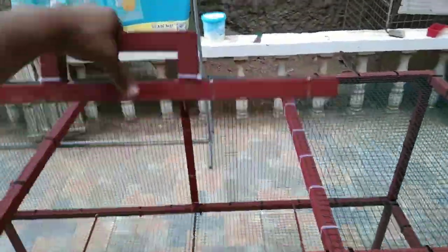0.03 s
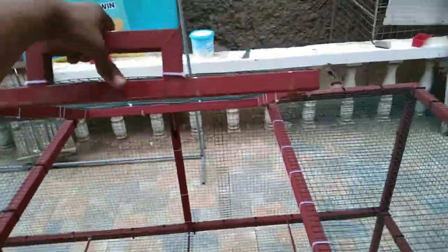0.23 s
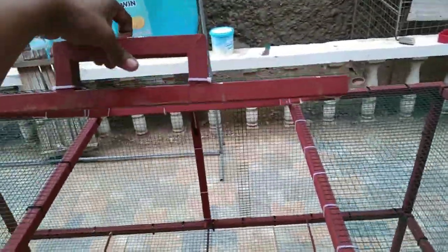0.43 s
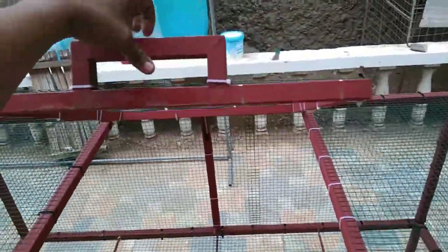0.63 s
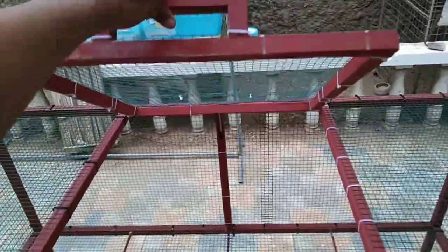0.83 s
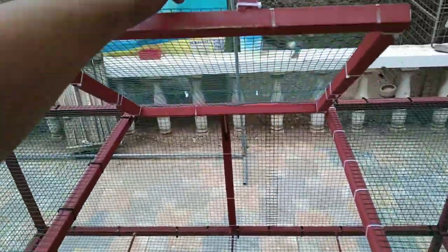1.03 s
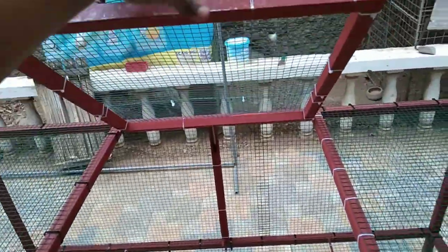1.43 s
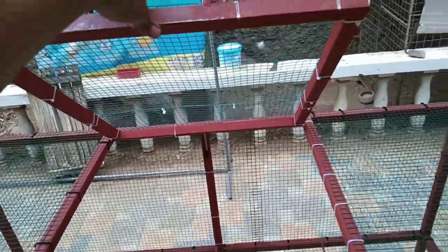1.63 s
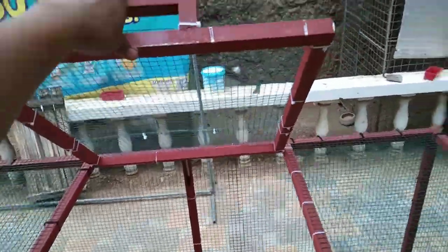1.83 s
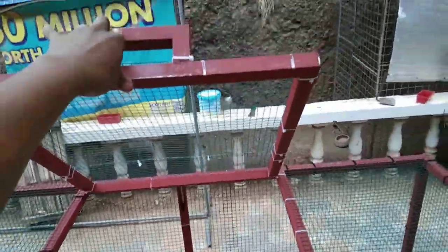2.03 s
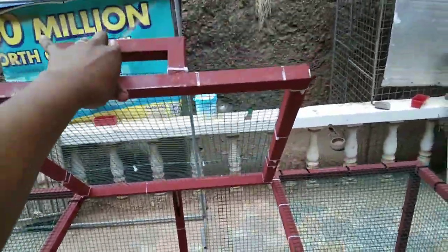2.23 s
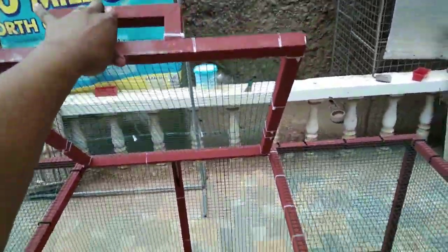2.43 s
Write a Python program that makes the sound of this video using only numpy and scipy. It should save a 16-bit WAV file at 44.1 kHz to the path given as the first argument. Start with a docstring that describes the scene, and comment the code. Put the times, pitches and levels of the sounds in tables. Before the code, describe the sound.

A wire-mesh cage lid clacks and rattles as it is lifted, its hinges squeaking faintly.

```python
"""A wire-mesh lid is lifted on a steel-framed cage, out on a patio, heard on one microphone.
The lid creaks, then clacks and chatters on its frame, setting wires and frame ringing. Farther off, its
wire hinges squeak in short, mostly falling slips while the frame drones softly. A dry rubbing hiss
follows as the lid is held open. Nearby walls add a thin tail; a low outdoor rumble lies under it all."""
import sys
import numpy as np
from scipy import signal
from scipy.fft import rfft, irfft
from scipy.io import wavfile

SR = 44100
rng = np.random.default_rng(int(sys.argv[2]) if len(sys.argv) > 2 else 0)


def wav_record(signal):
    """Record a signal, one row per channel, as 16-bit PCM in the file named by sys.argv[1]."""
    frames = np.transpose(np.atleast_2d(signal))
    bounded = np.clip(frames, -1, 1)
    # unit amplitude maps onto the largest positive 16-bit level
    quanta = np.round(bounded * 32767).astype(np.int16)
    wavfile.write(sys.argv[1], SR, quanta)


N = 114660
TIME = np.arange(N) / SR

# spectrum of the background rumble and faint hiss, cut steeply above about 8 kHz: f/Hz, level/dB
BACKGROUND_COLOUR = [(25, -40), (70, -2), (100, -4.5), (145, 4.5), (200, -11.5), (480, -15.5), (570, -25.5),
                     (700, -23.5), (850, -20.5), (3200, -18.5), (8200, -25), (9000, -45.5), (15000, -84)]
# course of the frame's drone: t/s, relative level/dB
DRONE_LEVEL = [(.6, -52.5), (.74, -44), (1.33, -49), (1.42, -58.5), (1.8, -54), (2.2, -52), (2.6, -48.5)]
# spectrum of the drone: f/Hz, level/dB
DRONE_COLOUR = [(170, -15.5), (310, 1.5), (470, -3), (550, -10.5), (640, -22)]
# dull bumps as the frame shifts: t/s, level/dB
BUMPS = [(1.658, -44)]
# low groans of the frame: t/s, length/s, f/Hz, fall/Hz, level/dB
GROANS = [(-.03, 0.065, 493, 20, -43), (.86, 0.056, 345, 10.5, -40.5), (.98, 0.05, 468.7, -7, -37.5),
          (1.822, .04, 460, 69.5, -48), (1.91, .12, 338, -7, -44)]
# course of the rubbing: t/s, relative level/dB
RUB_LEVEL = [(1.46, -74), (1.61, -50.5), (1.66, -40.5), (1.78, -37.5), (1.84, -40.5), (1.91, -52.5),
             (2.03, -46.5), (2.07, -48.5), (2.14, -46), (2.42, -46.5), (2.47, -55.5), (2.6, -67)]
# spectrum of the rubbing: f/Hz, level/dB
RUB_COLOUR = [(650, -77), (1500, -13.5), (3030, 0), (7850, -5), (9000, -12), (11000, -26), (15000, -43)]
# hinge slips: t/s, length/s, f/Hz, fall/Hz, level/dB
HINGE_SLIPS = [(.287, 0.015, 5330, -5, -42), (.664, 0.042, 3434, 221.5, -44),
               (.69, 0.015, 5500, -1100, -46), (.708, .025, 3700, -200, -42), (.785, 0.037, 3190, 339, -45),
               (.873, 0.038, 3070, 260.5, -43), (.974, 0.057, 2900, 128.5, -47),
               (1.085, .045, 2874, 88.5, -47), (1.168, 0.05, 2843, 159, -45.5),
               (1.283, .044, 2847, 112, -48)]
# a wire singing with the hinge: t/s, length/s, f/Hz, fall/Hz, level/dB
WIRE_TONES = [(1.12, 0.2, 4444, 30.4, -57)]
# creaks of the lid: t/s, length/s, f/Hz, fall/Hz, level/dB
CREAKS = [(.165, 0.033, 1833, -37.5, -40.5), (.195, 0.039, 1777, 58, -46.5)]
# scrapes of wire on steel: t/s, length/s, lowest resonance f/Hz, level/dB
SCRAPES = [(0.141, 0.1, 2530, -41), (0.69, 0.071, 3370, -42.5)]
# resonances of a scrape: ratio to the lowest, level/dB
SCRAPE_RESONANCES = [(1, 0.5), (1.25, 1), (1.55, -5)]
# small wire ticks: t/s, level/dB, centre f/Hz, rustle relative to the tick/dB
TICKS = [(0.849, -27.5, 6000, -25), (1.3425, -32, 4200, -11.5), (1.542, -40, 5000, -3.5)]
# spectrum of a tick: ratio to the centre, level/dB
TICK_COLOUR = [(.2, -28), (.55, -4.5), (1, 0.5), (1.4, -2.5), (2.2, -11)]
# spectrum of the cage's shudder: f/Hz, level/dB
SHUDDER_COLOUR = [(130, -22), (240, 4), (720, -3), (1000, -16.5), (3000, -32)]
# the frame's ringing modes: f/Hz, relative level/dB, t60/s
FRAME_MODES = [(3357, -4, .8), (3433, 2.5, 0.37), (3509, -6, .42), (3580, 1, 0.43), (3870, -1, 0.35),
               (4003, -9, 0.34), (6100, 4, 0.11), (6533, -3, 0.11), (6830, 6, 0.15)]
# the loose mesh buzzes between big contacts: t/s, length/s, opening relative level/dB
CHATTERS = [(0.242, .065, -18), (.324, .03, -22.5)]
# big contacts of lid and frame: t/s, relative level/dB, brightness/dB
CLACKS = [(0.0379, -15.5, -2.5), (0.2240, -8, -20), (0.2282, -10, 15.5), (0.2328, -9.5, 15.5),
          (0.2378, -16.5, 21), (0.2406, -7, 5), (0.2452, -13.5, 8.5), (0.2515, -8.5, 5.5),
          (0.2570, -7.5, -14), (0.2890, -15, -8), (0.301, -11, -18), (0.3207, -20, -4), (0.3245, -11.5, 0),
          (0.336, -19.5, 0), (0.3470, -22.5, -2), (0.4261, -17.5, -4), (0.4291, -16.5, 5.5)]
# spectrum of a contact: f/Hz, level/dB
CLACK_COLOUR = [(150, -26), (300, -11), (750, -8), (1100, -16), (2000, -13), (3000, -1.5), (4200, -2),
                (5000, -12.5), (6200, 0.5), (7400, -4), (9500, -9), (15000, -11)]


def from_db(db):
    """Decibels to gain."""
    return 10 ** (np.asarray(db) / 20)


def rms_one(x):
    """Scale to unit rms."""
    return x / np.sqrt(np.mean(x ** 2) + 1e-20)


def gain_at(colour, hz):
    """Gain of a spectrum table on a log-frequency axis."""
    table_hz, table_db = np.transpose(colour)
    return from_db(np.interp(np.log(hz + 0.0009), np.log(table_hz), table_db))


def noise(colour):
    """Unit noise with the given spectrum."""
    gain = gain_at(colour, np.fft.rfftfreq(N, 1 / SR))
    return rms_one(irfft(rfft(rng.standard_normal(N)) * gain, N))


def drift(per_s):
    """Smooth random motion of unit spread."""
    return rms_one(np.interp(TIME * per_s, np.arange(N), rng.standard_normal(N)))


def decay(t60, t=TIME):
    """Exponential fall by 60 dB in t60 seconds."""
    return np.exp(-np.log(1000) * t / t60)


def swell(start, length):
    """A rounded rise and fall."""
    return np.sqrt(np.abs(np.sin(np.pi * np.clip((TIME - start) / length, 0, 1))))


def phase_of(hz):
    """Running phase of a moving pitch."""
    return 2 * np.pi * np.cumsum(hz) / SR


def filtered(x, kind, hz, order):
    """Low-, high- or band-pass with a flat passband."""
    return signal.sosfilt(signal.butter(order, hz, kind, fs=SR, output="sos"), x)


def add(out, start, sound):
    """Mix a sound in at its time."""
    i = max(int(start * SR), 0)
    out[i:i + len(sound)] += sound[:N - i]


def background():
    """A steady low outdoor rumble with faint hiss."""
    return from_db(-47.5) * noise(BACKGROUND_COLOUR)


def patio(x, wet_db):
    """The direct sound plus a thin diffuse tail from the nearby walls."""
    tail = rng.standard_normal(N) * decay(t60=0.65) * (1 - decay(t60=0.065))
    tail /= np.sqrt(np.sum(tail ** 2))
    return x + from_db(wet_db) * signal.fftconvolve(x, tail)[:N]


def stick_slip(rows, jitter, jitter_per_s, flutter_db, octave_db):
    """Wavering friction tones that glide as each slip runs out; a negative fall rises."""
    out = np.zeros(N)
    for start, length, hz, fall_hz, db in rows:
        glide_hz = hz - fall_hz * np.clip((TIME - start) / length - 0.5, -0.5, 0.5)
        phase = phase_of(glide_hz * (1 + jitter * drift(jitter_per_s)))
        level = np.sqrt(2) * from_db(db + flutter_db * drift(120)) * swell(start, length)
        out += level * (np.sin(phase) + from_db(octave_db) * np.sin(2 * phase))
    return out


def frame_drone():
    """The moving frame hums low and unevenly, with bumps and short groans."""
    level = from_db(2 + np.interp(TIME, *np.transpose(DRONE_LEVEL)))
    bumps = sum(from_db(db) * swell(start, length=0.04) for start, db in BUMPS)
    hum = (level + bumps) * noise(DRONE_COLOUR)
    groans = stick_slip(GROANS, jitter=0.015, jitter_per_s=64, flutter_db=1, octave_db=-35)
    return filtered(hum + groans, "low", hz=540, order=12)


def rub():
    """Fine-grained sliding friction while the lid is held open."""
    level_db = 0.5 + np.interp(TIME, *np.transpose(RUB_LEVEL))
    grain_db = drift(500)
    return from_db(level_db + grain_db) * noise(RUB_COLOUR)


def hinges():
    """The wire hinges stick and slip in squeaks, and one wire sings along."""
    squeaks = stick_slip(HINGE_SLIPS, jitter=0.021, jitter_per_s=600, flutter_db=3.5, octave_db=-12)
    wire = stick_slip(WIRE_TONES, jitter=0.007, jitter_per_s=500, flutter_db=1.5, octave_db=-38)
    return squeaks + wire


def lid_creak():
    """The lid sticks and slips just before it lets go."""
    return stick_slip(CREAKS, jitter=0.04, jitter_per_s=600, flutter_db=1.5, octave_db=-8.5)


def wire_scrapes():
    """Rapid uneven catches of wire on steel excite a few broad resonances."""
    rough_db, catches_per_s, half_width = 2, 450, 0.085
    out = np.zeros(N)
    for start, length, hz, db in SCRAPES:
        friction = rng.standard_normal(N) * from_db(rough_db * drift(catches_per_s))
        body = np.zeros(N)
        for ratio, level_db in SCRAPE_RESONANCES:
            edges_hz = hz * ratio * np.exp([-half_width, half_width])
            body += from_db(level_db) * rms_one(filtered(friction, "band", edges_hz, order=2))
        out += from_db(db) * swell(start, length) * rms_one(body)
    return out


def wire_ticks():
    """Wires nudge into place and rustle briefly."""
    out = np.zeros(N)
    attack = 1 - np.exp(-TIME / 0.00051)
    for start, db, centre_hz, rustle_db in TICKS:
        shape = attack * (decay(t60=0.0073) + from_db(rustle_db) * decay(t60=0.16))
        colour = [(centre_hz * ratio, level_db) for ratio, level_db in TICK_COLOUR]
        add(out, start, from_db(db) * shape * noise(colour))
    return out


def cage_shudder():
    """The whole cage's low, dying response to the big clack."""
    start_s, rise_s, t60_s = 0.219, 0.015, 0.78
    t = np.maximum(TIME - start_s, 0)
    shape = (1 - np.exp(-t / rise_s)) * decay(t60_s, t)
    return 2 * from_db(-45) * shape * noise(SHUDDER_COLOUR)


def frame_ring():
    """Big contacts feed the frame's modes, which beat and waver as the lid shifts on its seat."""
    ring_db, beat_db, waver_hz = -30.5, 3, 7.1
    out, blows = np.zeros(N), np.zeros(N)
    for start, db, _ in CLACKS:
        add(blows, start, [from_db(db) ** 2])
    for hz, db, t60 in FRAME_MODES:
        kept_per_sample = decay(t60, 1 / SR) ** 2
        energy = signal.lfilter([1], [1, -kept_per_sample], blows + 1e-18)
        level = from_db(ring_db + db + beat_db * drift(34.4)) * np.sqrt(energy)
        out += level * np.sin(phase_of(hz + waver_hz * drift(58.7)))
    return out


def mesh_wires(t, count=260):
    """The short ring of the mesh's many wires, one row to a wire."""
    hz = rng.uniform(200, 12000, size=count)
    gain = gain_at(CLACK_COLOUR, hz)
    gain *= from_db(-18) / np.sqrt(np.sum(gain ** 2) / 2)
    return gain[:, None] * np.sin(2 * np.pi * hz[:, None] * t) * decay(0.17, t)


def chatter():
    """Small, uneven, fading bounces of the loose mesh, as rows like those of CLACKS."""
    bounces_per_s, fade_db_per_s, bright_db = 330, 67, 0.5
    rows = []
    for start, length, db in CHATTERS:
        delays = (np.arange(60) + rng.random(60)) / bounces_per_s
        rows += [(start + delay, db - fade_db_per_s * delay, bright_db)
                 for delay in delays if delay < length]
    return rows


def lid_clacks():
    """Each contact is a crack and a bright steel chink; it rings the wires with strengths of its own."""
    chink_hz, chink_width_hz, treble_hz = 6686, 1700, 5230
    treble_share = 0.2  # how far crack and ring follow a contact's brightness
    out, t = np.zeros(N), TIME[:SR // 4]
    wires = mesh_wires(t)
    crack = noise(CLACK_COLOUR)
    crack_shape = from_db(-9) * decay(0.03, t)
    chink = np.sin(phase_of(chink_hz + chink_width_hz / 2 * drift(chink_width_hz)))
    chink_shape = from_db(-3) * decay(0.0092, t) * (1 - decay(0.0046, t))
    for start, db, bright_db in list(CLACKS) + chatter():
        hit = crack_shape * np.roll(crack, rng.integers(N))[:len(t)]
        hit += rng.standard_normal(len(wires)) @ wires
        body = filtered(hit, "low", treble_hz, order=3)
        treble = from_db(treble_share * bright_db) * filtered(hit, "high", treble_hz, order=3)
        steel = from_db(bright_db) * chink_shape * np.roll(chink, rng.integers(N))[:len(t)]
        add(out, start, from_db(db) * (body + treble + steel))
    return out


def scene():
    """The cage over the background; the hinges are farther from the microphone and sound wetter."""
    far = hinges()
    near = lid_creak() + lid_clacks() + frame_ring() + wire_ticks() + wire_scrapes()
    metal = patio(near, wet_db=-16) + patio(far, wet_db=-4.5)
    # the top treble of the clacks, ticks and squeaks is softened
    softened = filtered(metal, "low", hz=7800, order=5)
    return (softened + cage_shudder() + frame_drone() + rub() + background())[None]


def record(dry):
    """The microphone sheds the deepest bass; the top is cut steeply."""
    thin = filtered(dry, "high", hz=35, order=1)
    top_cut = signal.cheby2(16, 60, 15800, fs=SR, output="sos")  # 60 dB down from 15.8 kHz
    return signal.sosfilt(top_cut, thin)


dry = scene()
out = record(dry)
wav_record(out)
```